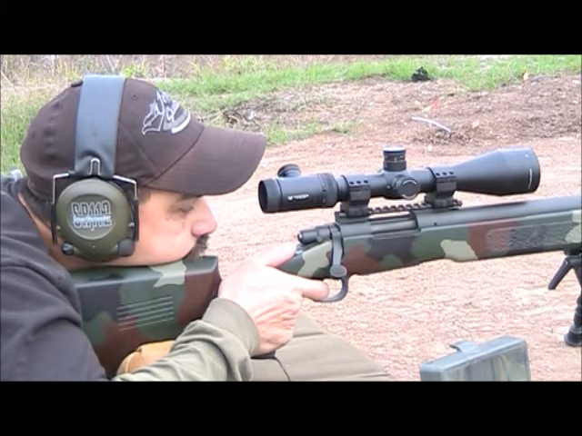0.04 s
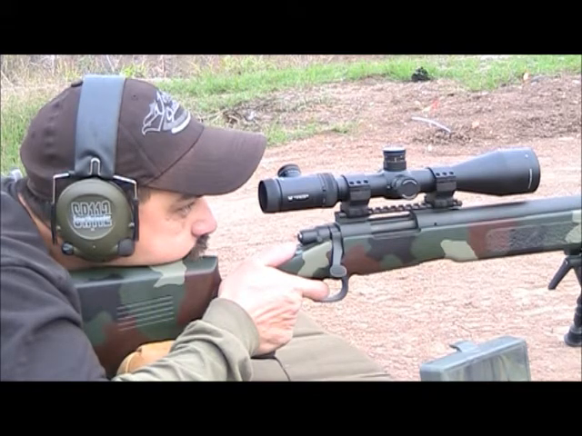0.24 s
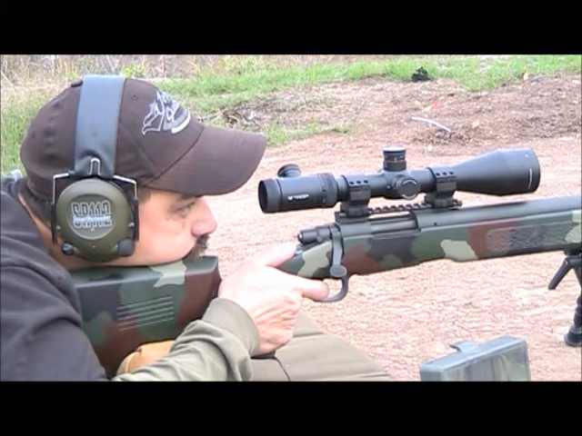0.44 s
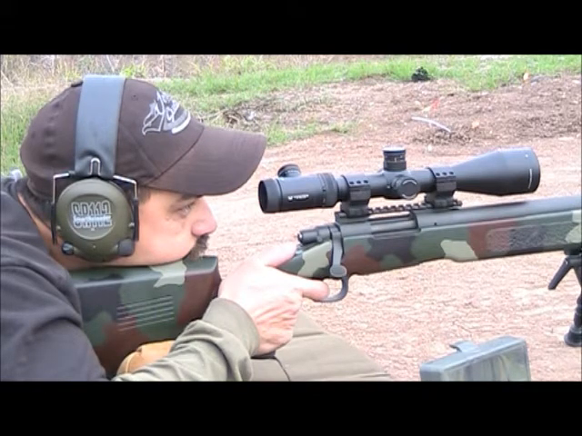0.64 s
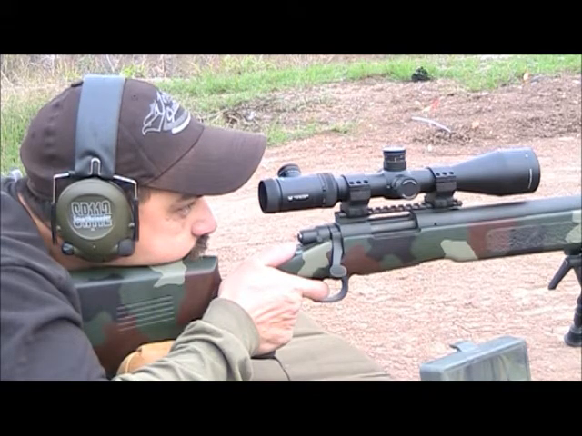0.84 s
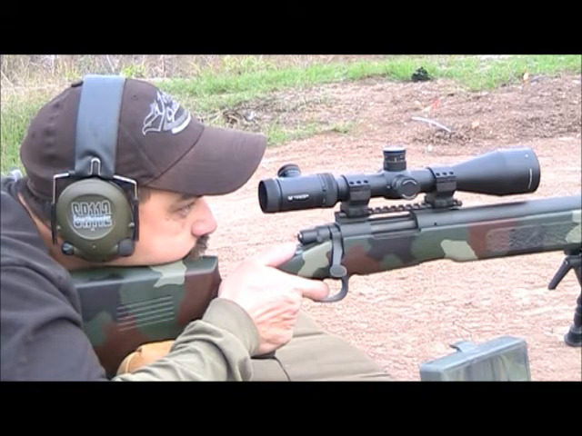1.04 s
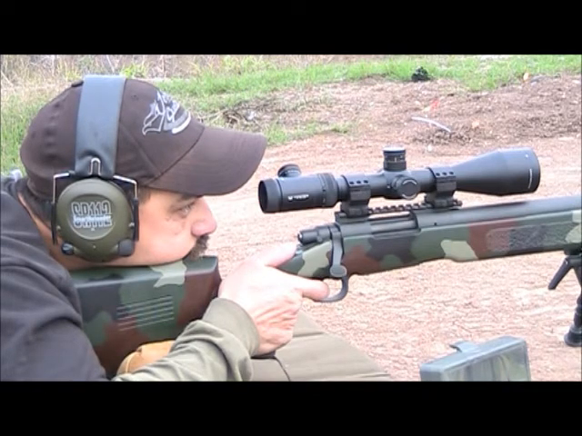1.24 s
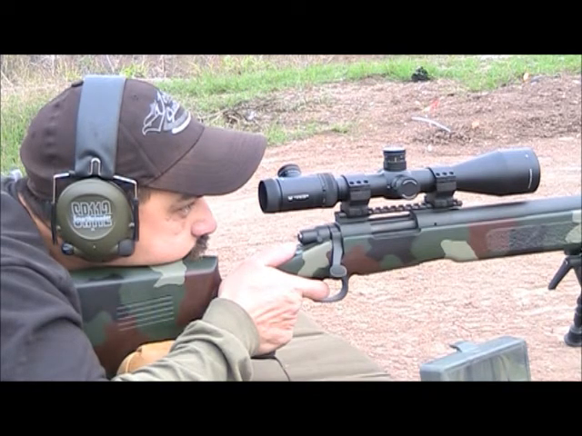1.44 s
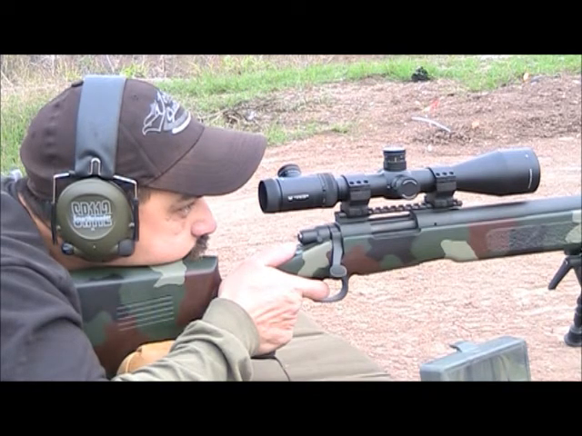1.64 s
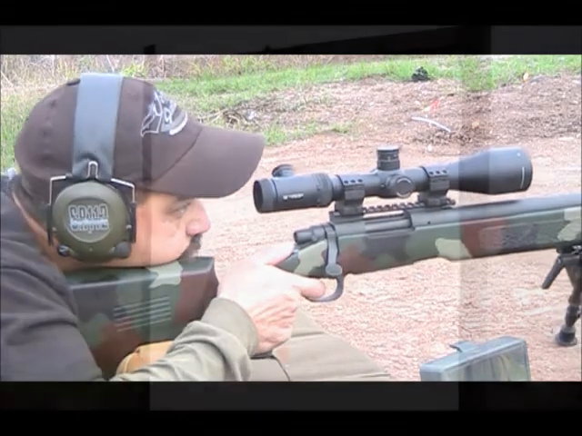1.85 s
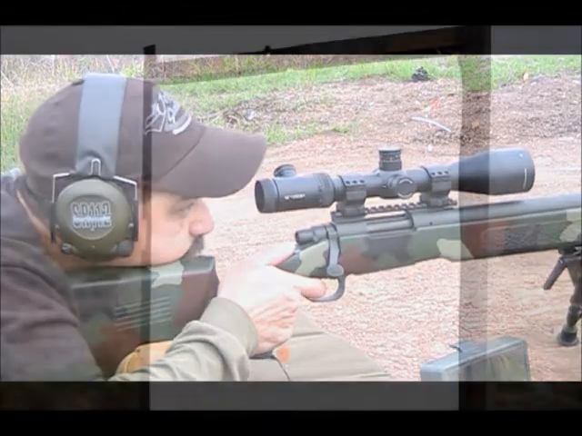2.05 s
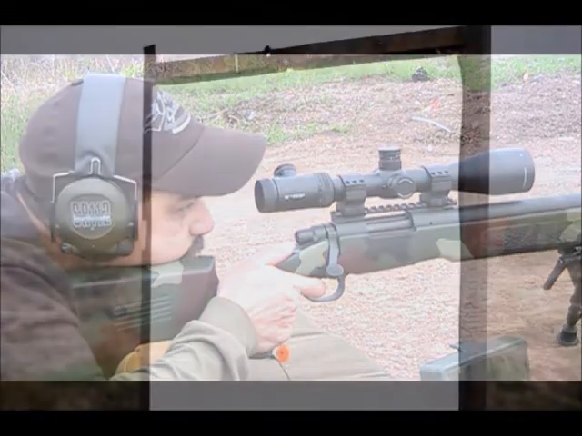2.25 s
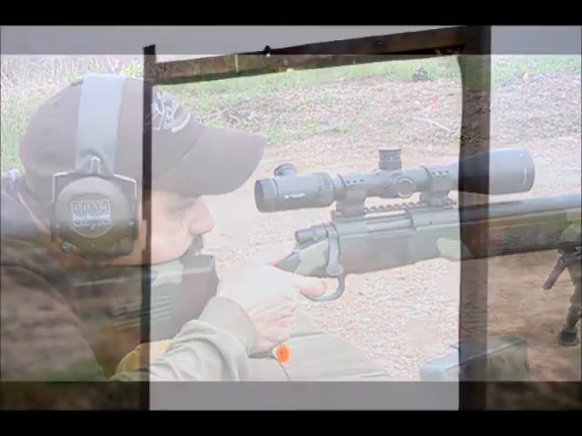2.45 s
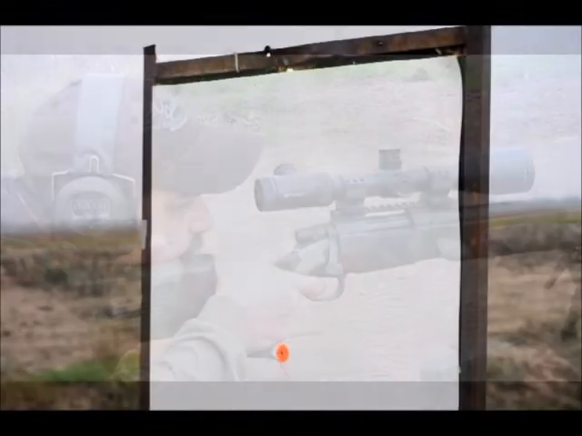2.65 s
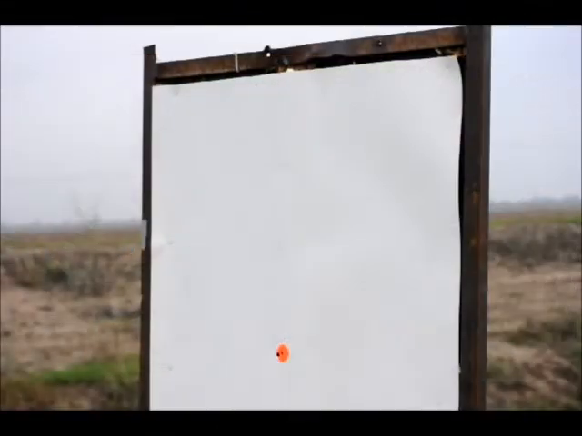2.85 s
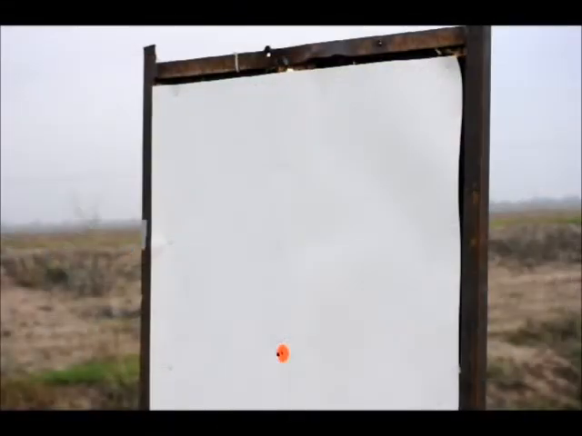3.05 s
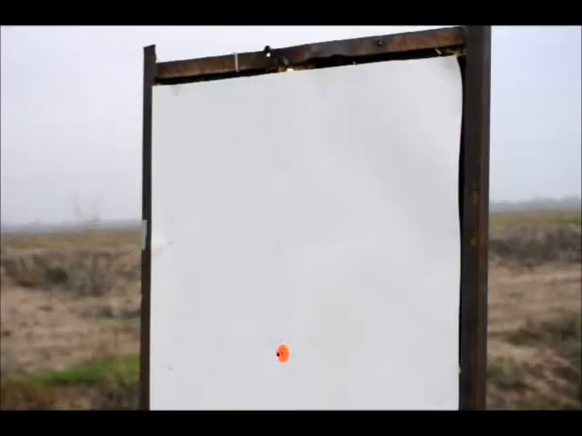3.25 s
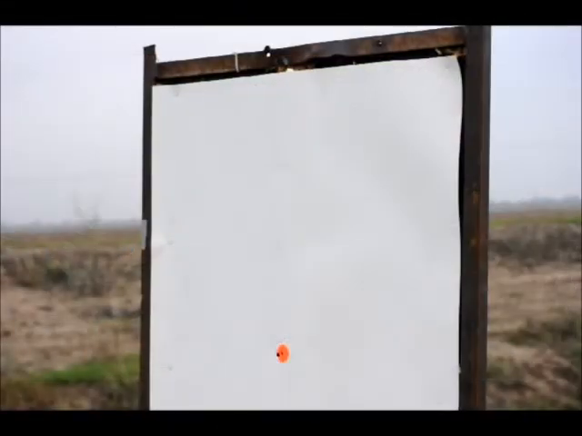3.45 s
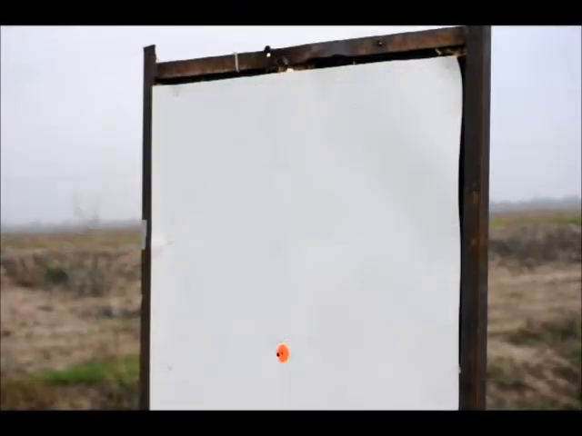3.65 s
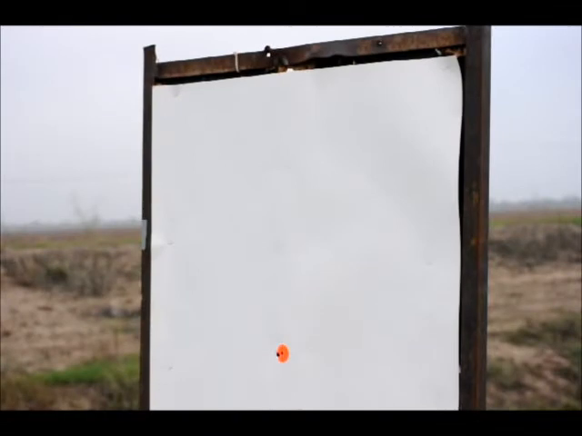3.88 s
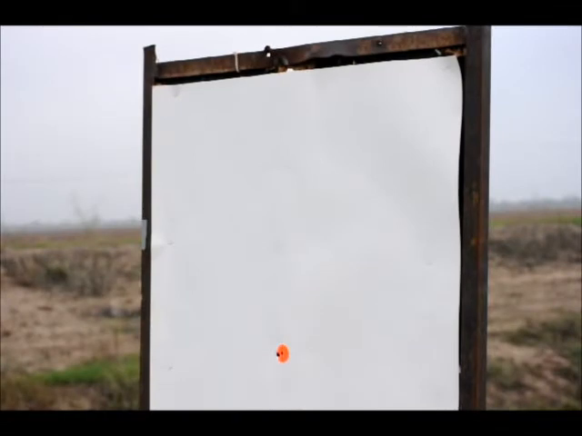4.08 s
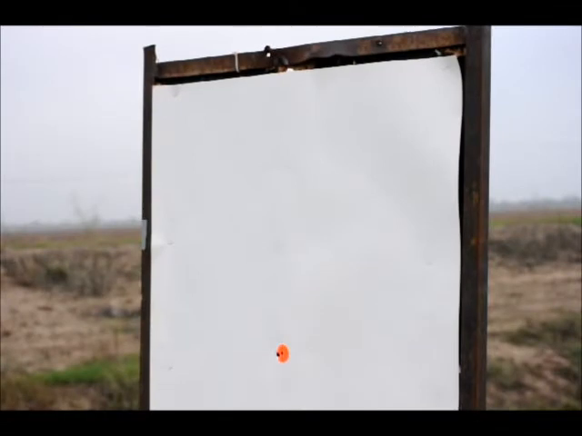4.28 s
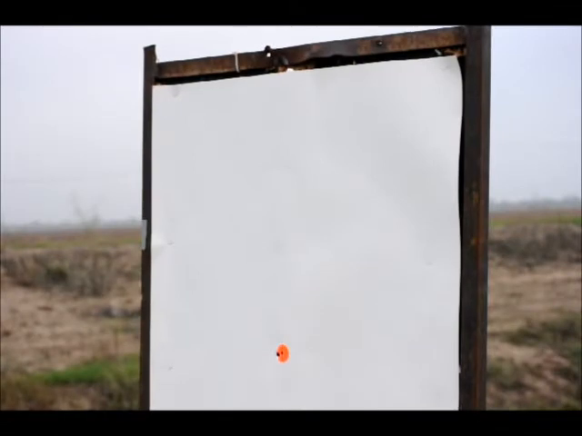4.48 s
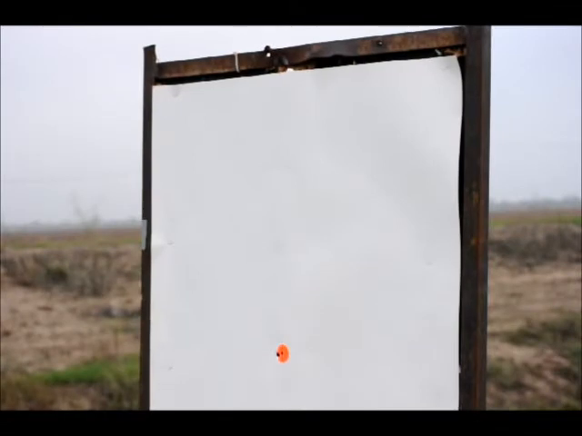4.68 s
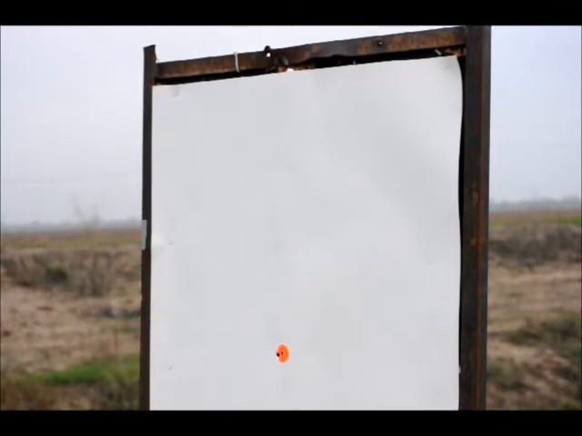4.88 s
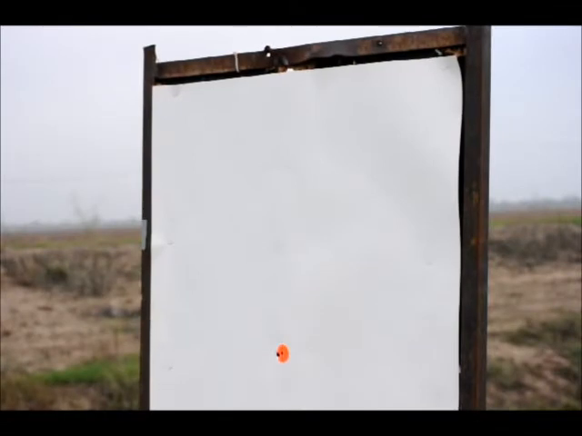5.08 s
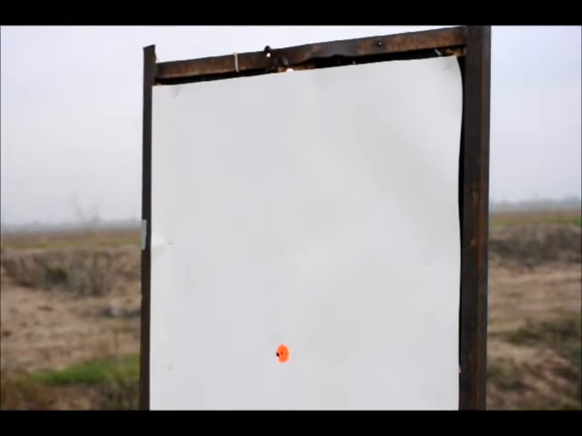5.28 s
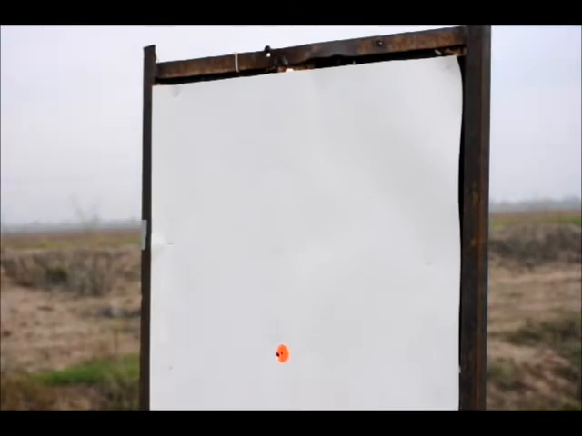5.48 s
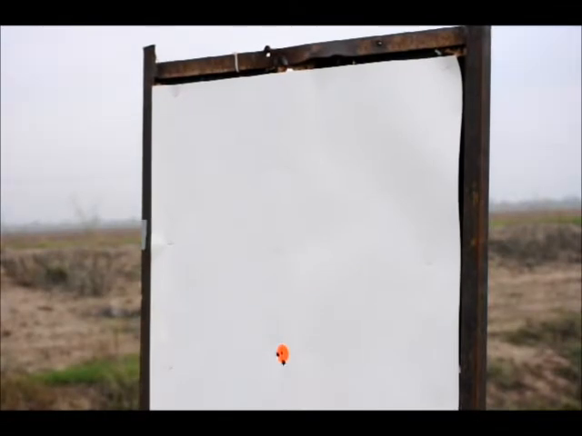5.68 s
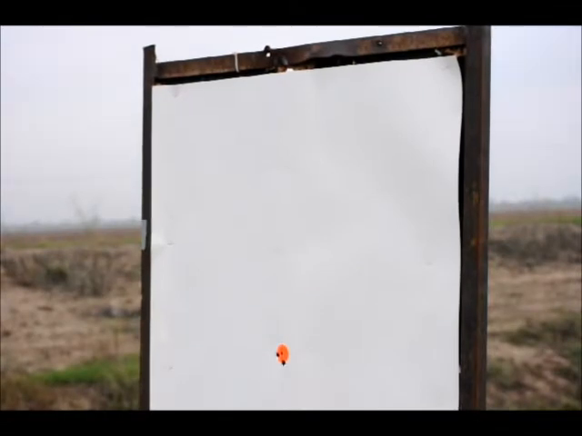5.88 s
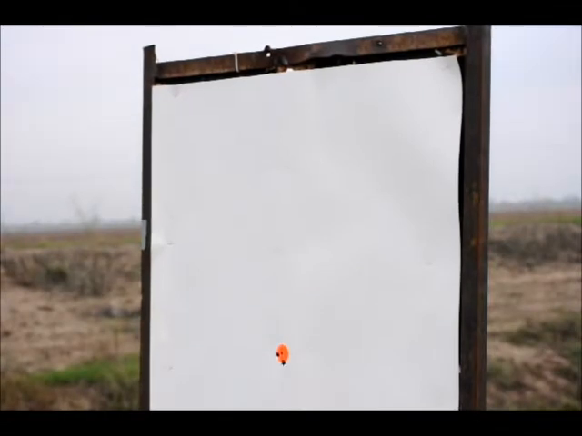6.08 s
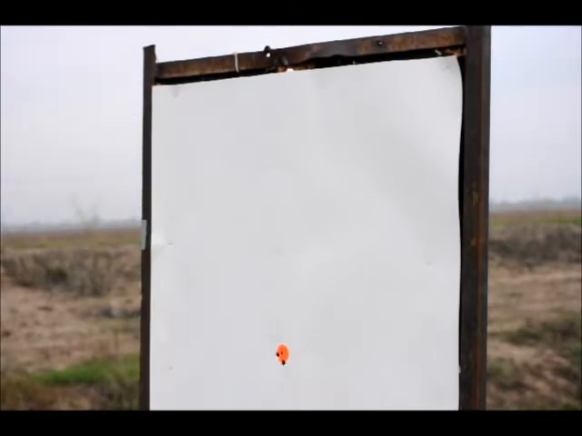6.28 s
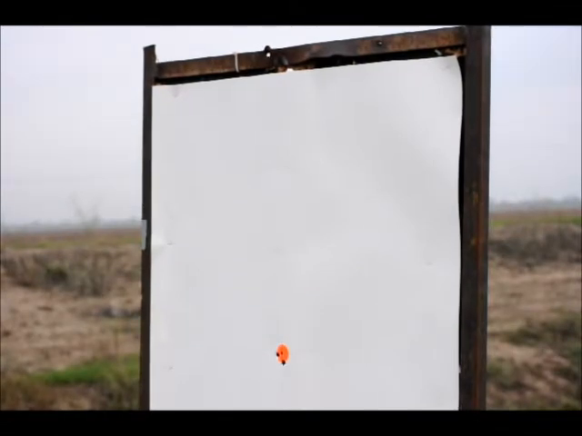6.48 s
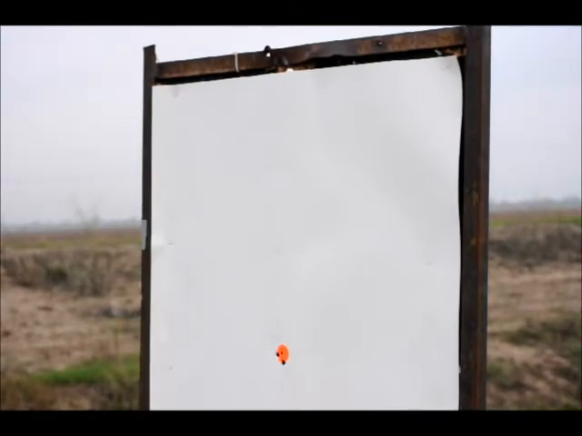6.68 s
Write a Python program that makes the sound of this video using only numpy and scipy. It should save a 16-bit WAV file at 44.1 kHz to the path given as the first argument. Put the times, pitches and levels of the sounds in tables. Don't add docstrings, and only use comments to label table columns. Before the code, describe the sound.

Quiet, wide outdoor air, then a rifle fires right beside the stereo microphone, overloading it. The spent case and grit tick and ring, while echoes return from banks and trees. The sound crossfades to a dull mono microphone at a windy target. A bullet cracks into the board, with grit and a muzzle boom just behind; echoes fade under wind rumble. Later a second bullet hits the same way.

```python
import sys
import numpy as np
from scipy import signal
from scipy.fft import rfft, irfft, next_fast_len
from scipy.io import wavfile
from scipy.ndimage import uniform_filter1d

SR = 44100
rng = np.random.default_rng(int(sys.argv[2]) if len(sys.argv) > 2 else 0)


def waveform_to_disk(signal):
    frames = np.transpose(np.atleast_2d(signal))
    scaled = np.clip(frames, -1, 1) * 32767
    samples = np.round(scaled).astype(np.int16)
    wavfile.write(sys.argv[1], SR, samples)


def volts(x):
    e = np.asarray(x, float) / 20
    return 10 ** e


N = 296528
TIME = np.arange(N) / SR
FAST = next_fast_len(N)
HZ = np.fft.rfftfreq(FAST, 1 / SR) + 1e-3
BLAST_S = 1.7688
# start_s, end_s
FADE_S = (1.8, 2.96)


def unit(x):
    return x / np.sqrt(np.mean(x ** 2))


def table_db(points):
    hz, db = np.transpose(points)
    return np.interp(np.log(HZ), np.log(hz), db)


def filtered(x, gain):
    return irfft(rfft(x, FAST) * gain, FAST)[:N]


def noise(db=0, lo_hz=1, hi_hz=30000, source=None):
    edges = 1 / np.sqrt((1 + (lo_hz / HZ) ** 8) * (1 + (HZ / hi_hz) ** 8))
    x = rng.standard_normal(N) if source is None else source
    return unit(filtered(x, volts(db) * edges))


def walk(rate):
    k = int(SR / rate)
    steps = np.repeat(rng.standard_normal(N // k + 1), k)
    return unit(uniform_filter1d(steps, k)[:N])


def clumps(lumpy_db):
    size_db = 1.3 * rng.exponential(size=N) + lumpy_db * walk(90)
    return rng.standard_normal(N) * volts(size_db)


def tone(hz):
    return np.sin(2 * np.pi * np.cumsum(hz) / SR)


def bandpass(x, lo_hz, hi_hz):
    band = signal.butter(2, [lo_hz, hi_hz], "band", fs=SR, output="sos")
    return signal.sosfilt(band, x)


def add(out, s, x):
    part = out[..., int(s * SR):][..., :x.shape[-1]]
    part += x[..., :part.shape[-1]]


def stereo(mid, side):
    return np.array([mid + side, mid - side])


def echoes(shots, land, edges, narrow_db, rise_s, lumpy_db, flicker_db, tilt_db=0):
    delay, db, depth, t60, hz = np.transpose(land)[:, :, None]
    slow = TIME[::32]
    power = 0
    for s in shots:
        t = slow - s - delay
        rise = np.exp(2 * np.minimum(t, 0) / rise_s)
        power = power + rise * volts(2 * (db - 60 * np.maximum(t - depth, 0) / t60))
    narrow_db = narrow_db * np.where(hz < 500, 2, 1)
    clicks, out = clumps(lumpy_db), 0
    for lo, hi in zip(edges, edges[1:]):
        off_db = narrow_db * np.log2(np.sqrt(lo * hi) / hz) ** 2
        off_db = off_db + 24 * np.abs(delay) * lo * hi / 1e8
        gain = np.interp(TIME, slow, np.sqrt(np.sum(power * volts(-2 * off_db), axis=0)))
        out = out + gain * volts(flicker_db * walk(25)) * noise(0, lo, hi, clicks)
    return filtered(out, volts(tilt_db))


def slaps(shots, faces):
    out, t = np.zeros(N), TIME[:1024]
    for delay, db, hz in faces:
        grain = unit(bandpass(rng.standard_normal(1024), hz / 1.6, hz * 1.7))
        slap = volts(db - 7.5) * grain * np.exp(-t / .006)
        for s in shots:
            add(out, s + delay, slap)
    return out


# pitch_hz, level_db (per Hz)
NEAR_AIR = [(15, -46), (25, -17), (64, -6.5), (113, -2), (282, -8), (323, -11.5), (360, -11), (829, -21),
            (5040, -34), (6090, -35.5), (15600, -45.5)]
# pitch_hz, level_db
NEAR_AIR_SIDE = [(60, 11.5), (110, -3.5), (200, -0.5), (380, 4), (700, 8), (1290, 8.5), (2380, 10),
                 (4400, 8), (8120, 6.5), (15000, -1)]


def near_air():
    swell = volts(-54 + .8 * walk(3) + 1.1 * walk(15))
    mid_db = table_db(NEAR_AIR)
    return swell * stereo(noise(mid_db), volts(0.5) * noise(mid_db + table_db(NEAR_AIR_SIDE)))


# low_hz, high_hz, level_db, time to fall 60 dB_s, side_db
BLAST = [
    (110, 450, -7, .3, -4),
    (450, 950, -3, .12, -5),
    (950, 3500, -8.5, .07, -2),
    (3500, 8000, -5, .065, -3),
    (8000, 15000, -9, .06, -2),
]


def blast():
    t = TIME - BLAST_S
    hold_s = .009
    after = np.maximum(t - hold_s, 0)
    duck_db = -13 * (1 - np.exp(-after / 0.00061))
    front = np.exp(np.minimum(t, 0) / 0.00015)
    out = 0
    for lo, hi, db, t60, side_db in BLAST:
        shape = np.where(t < 0, front, volts(duck_db - 60 * after / t60))
        out = out + volts(db) * shape * stereo(noise(0, lo, hi), volts(side_db) * noise(0, lo, hi))
    return out


# start_s, peak_db, centre_hz, left minus right_db
CASE = [(1.8487, -22, 2960, 5.5), (1.8674, -28.5, 4010, 0), (2.0467, -11.5, 2600, 1.5),
        (2.0732, -19, 4200, 5.5), (2.1365, -18, 3600, -9), (2.15, -17, 3300, 2), (2.2443, -31, 3200, 8),
        (2.4364, -38, 3800, 1.5), (2.4922, -33, 4800, 2), (2.497, -36, 4800, 2)]
# start_s, pitch_hz, level_db, time to fall 60 dB_s, right gain (0-1)
CASE_RING = [(1.779, 650, -13.5, 0.07, .9), (1.806, 330, -15, 0.12, .9), (1.805, 1500, -25, 0.059, .5),
             (1.817, 1500, -27, 0.062, .5), (2.07, 230, -19, 0.038, .9), (2.109, 313, -20.5, 0.051, .9),
             (2.053, 4100, -30.5, .08, .6), (2.075, 4780, -22.5, 0.05, 0.4), (2.086, 4000, -33, 0.12, .6),
             (2.094, 7560, -37, 0.053, .6)]


def spent_case():
    out, t = np.zeros((2, N)), TIME[:4410]
    for s, db, hz, pan_db in CASE:
        z = rng.standard_normal((2, 400))
        grain = unit(bandpass(z[0] + .7 * z, hz / 1.5, hz * 1.9))
        tick = np.exp(-t[:400] / .001) * grain
        add(out, s, volts(db - 3 + np.array([[pan_db], [-pan_db]]) / 2) * tick)
    for s, hz, db, t60, right in CASE_RING:
        ring = volts(db - 60 * t / t60) * np.sin(2 * np.pi * hz * t)
        add(out, s, ring * np.array([[1.], [right]]))
    return out


# delay_s, level_db, depth_s, time to fall 60 dB_s, centre_hz
NEAR_LAND = [(0.038, -31.5, 0.0095, 0.13, 270.6), (.04, -43.5, 0.0058, .2, 1293),
             (0.081, -39.5, 0.22, 1.3, 200.4), (0.08, -46, .015, 0.1, 3595), (.045, -52.5, 0.24, 2, 4200),
             (.255, -49.5, .02, 0.37, 4030), (.285, -42, 0.026, 0.77, 2410),
             (0.299, -31.5, 0.0076, 0.1, 250), (.372, -51, 0.0091, .2, 4093),
             (0.419, -50, 0.035, 0.27, 5330), (.55, -52, .08, 1.1, 200), (0.602, -56.5, .45, 3, 194),
             (.15, -49, 0.49, 1.23, 65), (.6, -58.5, .45, 2.4, 1790), (.84, -52, .05, 1.1, 3550),
             (.91, -46.5, 0.021, 0.7, 2200), (.99, -50.5, 0.073, 1.3, 2400)]
# pitch_hz, side minus mid_db
NEAR_SIDE = [(150, -25), (1000, -12), (3500, -0.5), (9000, 2.5)]
# delay_s, peak_db, centre_hz
NEAR_SLAPS = [(.888, -34, 2920), (.921, -20, 1900), (.938, -23, 1900), (.992, -27, 1830)]


def near_echoes():
    edges = np.geomspace(35, 15000, 13)
    mid, side = (echoes([BLAST_S], NEAR_LAND, edges, narrow_db=6, rise_s=.011,
                        lumpy_db=1.1, flicker_db=.51, tilt_db=tilt_db)
                 for tilt_db in (0, table_db(NEAR_SIDE)))
    return stereo(mid + slaps([BLAST_S], NEAR_SLAPS), side)


# pitch_hz, level_db (per Hz)
TARGET_AIR = [(12, -32), (20, -13.5), (80, -4.5), (230, -2.5), (336, -3), (550, -7), (2420, -20),
              (2920, -16.5), (5500, -26.5), (7150, -64), (12100, -120)]
# pitch_hz, width_hz, level_db
WHINE = [
    (310, 90, -53.5),
    (2190, 120, -68),
    (3015, 130, -63),
]


def target_air():
    air = volts(-50.5 + 0.41 * walk(8.2)) * noise(table_db(TARGET_AIR))
    for hz, width, db in WHINE:
        peak_db = -10 * np.log10(1 + ((HZ - hz) / width * 2) ** 4)
        whine = noise(0, hz - width / 2, hz + width / 2, noise(peak_db))
        air = air + volts(db + .4 * walk(12)) * whine
    return air


# time_s, level_db
WIND = [(2.95, -58.5), (3.04, -44), (3.44, -71), (3.6, -55.5), (3.75, -46.5), (4.15, -56), (4.31, -42),
        (4.45, -48), (4.69, -51), (5.03, -49), (5.18, -59), (5.46, -58.5), (5.66, -61), (5.76, -67),
        (6.15, -58), (6.29, -55.5), (6.56, -56.5), (6.72, -53)]


def target_wind():
    level_db = np.interp(TIME, *np.transpose(WIND)) + 3.6 * walk(25)
    return volts(level_db) * noise(0, 28, 150, clumps(1.2))


# centre_s, peak_db, width_ms, direction (push +1 or pull -1)
GUSTS = [(2.275, -50, 1.7, -1), (2.3133, -22.5, 2.26, 1), (2.3475, -33, 2.8, -1), (2.3916, -34, 5.6, 1),
         (2.426, -32.5, 4.7, -1), (3.742, -28, 3.6, 1), (3.8098, -35, 5, -1), (3.9143, -31.5, 3.2, 1),
         (4.289, -24, 3.5, 1), (4.5919, -28, 2.8, 1), (4.875, -31, 4.7, -1), (5.0168, -32, 5.4, 1),
         (5.1825, -24, 3.1, 1), (5.5176, -30.5, 5.2, 1), (6.094, -30, 4, -1)]


def gusts():
    out = np.zeros(N)
    for s, db, ms, sign in GUSTS:
        u = (TIME[:2646] - .03) * 1000 / (.5 * ms)
        add(out, s - .03, np.sign(sign) * volts(db) * (1 - u ** 2) * np.exp(-u ** 2 / 2))
    return out


# centre_s, width_ms, level_db
PORT_GUSTS = [
    (2.33, 14, -48),
    (2.365, 6.6, -31),
    (2.41, 16, -45.5),
]


def port_wind():
    shape = sum(volts(db) * np.exp(-((TIME - s) * 1000 / ms) ** 2) for s, ms, db in PORT_GUSTS)
    return stereo(0, shape * noise(0, 40, 170))


# start_s, last_hz, sweep_ms, thud_hz, thud_ms
CRACKS = [
    (2.8855, 1300, 3.7, 225, 7),
    (5.6288, 2500, 1.4, 400, 5.7),
]


def cracks():
    out, t = np.zeros(N), TIME[:1323] - .004
    after = np.maximum(t, 0)
    rough = noise(0, 550, 5500)
    rise = np.exp(np.minimum(t, 0) / .0004)
    for s, last_hz, sweep_ms, thud_hz, thud_ms in CRACKS:
        hz = last_hz + (5212 - last_hz) * np.exp(-after / (0.5 * sweep_ms / 1000))
        sweep = tone(hz) * np.exp(-np.maximum(t - sweep_ms / 1000, 0) / .0005)
        late = np.clip(t * 1000 / sweep_ms, 0, 1) ** 2
        late = late * np.exp(-np.maximum(t - thud_ms / 1000, 0) / .0005)
        sag_hz = thud_hz * (1 + 1.6 * np.exp(-after / .0035))
        i = int(s * SR)
        thud = late * (tone(sag_hz) - .2 + 0.62 * rough[i:i + 1323])
        add(out, s - .004, rise * sweep + thud)
    return out


# start_s, length_ms, level_db, low_hz, high_hz
DEBRIS = [(2.8922, 2, -11, 200, 5500), (2.8963, .5, -15, 500, 5500), (2.899, .7, -21, 500, 5500),
          (2.9019, .6, -21, 500, 5500), (2.9045, 8, -20, 400, 5500), (2.909, 6.3, -11, 1800, 5500),
          (2.915, 8, -24, 1500, 5500), (2.9215, 3, -19, 3000, 5500), (3.0295, 7.5, -13, 700, 5000),
          (3.048, 1, -14, 800, 5500), (5.6345, 4, -10, 500, 5500), (5.638, 4, -19, 500, 5500),
          (5.642, 1.5, -10, 400, 5500), (5.6435, 8, -16, 1200, 5500), (5.653, 4.5, -15, 1500, 5500),
          (5.735, .8, -27, 1500, 4500), (5.7735, 7.3, -15, 800, 5500), (5.791, 2, -20, 800, 5500)]


def debris():
    out, t_ms = np.zeros(N), TIME[:2048] * 1000
    for s, ms, db, lo, hi in DEBRIS:
        gate = np.clip(t_ms / (.3 * ms), 0, 1) * np.exp(-np.maximum(t_ms - ms, 0) / (.15 * ms))
        grain = unit(bandpass(rng.standard_normal(2048), lo, hi))
        add(out, s, volts(db) * bandpass(grain * gate, lo, hi))
    return out


# delay after the boom_s, level_db,
# depth_s, time to fall 60 dB_s, centre_hz
FAR_LAND = [(-.12, -30.5, 0.011, 0.42, 4860), (-.12, -47, 0.014, 0.32, 1400), (-.12, -41, 0.028, 0.1, 300),
            (0.016, -35, 0.0042, 0.89, 3400), (0.018, -39, 0.0028, 0.067, 320),
            (.045, -40.5, 0.12, 0.52, 260), (.22, -47, .015, .2, 420), (0.073, -38, 0.01, 0.25, 2670),
            (0.11, -35.5, 0.0094, 0.052, 208), (.13, -50, 0.16, 0.29, 1500),
            (0.179, -44, 0.059, 0.83, 3650), (0.394, -44, 0.013, 0.26, 1910), (0.448, -45, 0.14, 0.9, 1740),
            (.45, -51, .16, 0.83, 4300), (0.301, -57.5, 0.24, 8.4, 1970), (.77, -60, .06, .8, 1300),
            (.95, -55.5, 0.027, 0.27, 2600), (1.1, -55.5, 0.029, 0.3, 2930), (1.37, -59, 0.048, 0.29, 2940),
            (1.52, -60, 0.039, 0.38, 1630), (1.76, -65, 0.04, 0.61, 1760), (2.25, -63.5, 0.23, 1.44, 900)]


def far_echoes(shots):
    edges = np.geomspace(110, 5400, 12)
    return echoes(shots, FAR_LAND, edges, narrow_db=9.5, rise_s=.009, lumpy_db=1.1, flicker_db=.9)


# start_s, level_db, first_hz, last_hz, glide_ms
BOOMS = [
    (3.0373, 6.5, 469, 161.1, 1.6),
    (5.7806, 3.5, 411, 145.5, 2.2),
]
# delay_ms, level_db
BOOM_ECHO = [
    (4, -15),
    (11.3, -15.5),
    (21, -36),
]


def booms():
    out, t_ms = np.zeros(N), TIME[:2205] * 1000
    fade = np.exp(-(t_ms / 3.38) ** 2)
    for s, db, first_hz, last_hz, glide_ms in BOOMS:
        hz = last_hz + (first_hz - last_hz) * np.exp(-t_ms / glide_ms)
        wave = -volts(db) * np.cos(2 * np.pi * np.cumsum(hz) / SR - .8) * fade
        add(out, s, wave)
        dull = uniform_filter1d(wave, int(0.00076 * SR))
        for ms, echo_db in BOOM_ECHO:
            add(out, s + ms / 1000, volts(echo_db) * dull)
    return out


# first_hz, last_hz
ROLL_HZ = (215, 188)
# start_s, end_s
ROLL_S = (.195, .29)


def roll(shots):
    t = TIME[:int(.5 * SR)]
    hz = np.interp(t, ROLL_S, ROLL_HZ) * (1 + 0.027 * walk(45)[:len(t)])
    on = np.clip((t - ROLL_S[0]) / 0.023, 0, 1) * np.exp(-np.maximum(t - ROLL_S[1], 0) / .02)
    level_db = -27 - 60 * t / 2.2 + 1.5 * walk(40)[:len(t)]
    wave = on * volts(level_db) * tone(hz)
    out = np.zeros(N)
    for s in shots:
        add(out, s, wave)
    return out


# delay after the boom_s, peak_db, centre_hz
FAR_SLAPS = [(.4, -25, 1670), (.434, -24, 1900), (.454, -21.5, 1600), (.504, -30, 1930), (.547, -24, 1720),
             (.57, -22, 1720), (.598, -24, 1670), (.632, -23, 1380), (.65, -25, 1400), (.708, -33, 1150),
             (.778, -32, 1130), (.948, -37, 2395), (1.112, -40, 3000), (1.373, -33, 2500),
             (1.422, -38, 2300), (1.521, -37, 1580), (1.756, -36, 1117)]


def far_slaps(shots):
    return slaps(shots, FAR_SLAPS)


# start_s, end_s, first_hz, last_hz, first_db, last_db
TUMBLE = (5.655, 5.775, 4650, 4240, -32, -39)


def tumbling_bullet():
    hz = np.interp(TIME, TUMBLE[:2], TUMBLE[2:4]) * (1 + 0.0061 * walk(67))
    on = (TIME > TUMBLE[0]) & (TIME < TUMBLE[1])
    level_db = np.interp(TIME, TUMBLE[:2], TUMBLE[4:]) + 3.0 * walk(87)
    return on * volts(level_db) * tone(hz)


def firing_point():
    fade = np.interp(TIME, [FADE_S[0], FADE_S[1] - .04, FADE_S[1]], [1, .7, 0])
    return (near_air() + near_echoes()) * fade + blast() + spent_case() + port_wind()


def target():
    arrive = np.interp(TIME, FADE_S, [0, 1])
    shots = [row[0] for row in BOOMS]
    x = target_air() * arrive + target_wind() * arrive ** 4 + gusts()
    x = x + cracks() + debris() + tumbling_bullet()
    x = x + booms() + far_echoes(shots) + roll(shots) + far_slaps(shots)
    return filtered(x, 1 / np.sqrt(1 + (HZ / 5400) ** 110))


def scene():
    return firing_point() + target()


def band_limit(x):
    return signal.sosfilt(signal.butter(12, 15770, fs=SR, output="sos"), x)


def record(dry):
    return band_limit(np.clip(dry, -1, 1))


dry = scene()
out = record(dry)
waveform_to_disk(out)
```